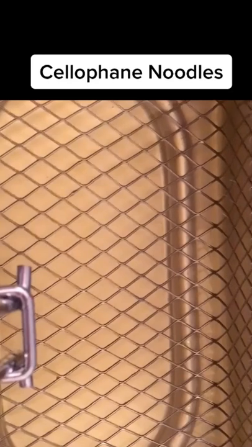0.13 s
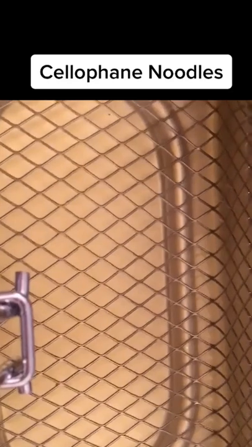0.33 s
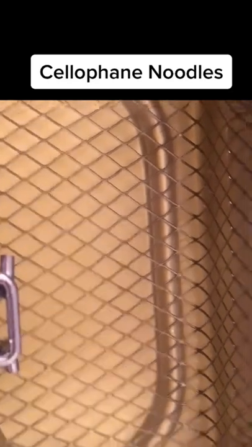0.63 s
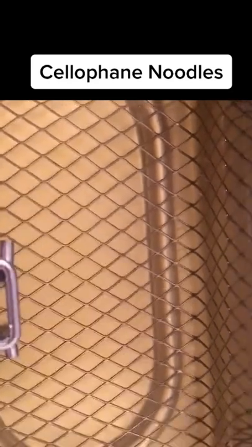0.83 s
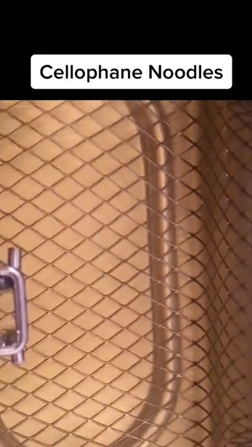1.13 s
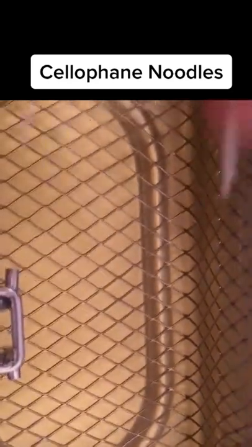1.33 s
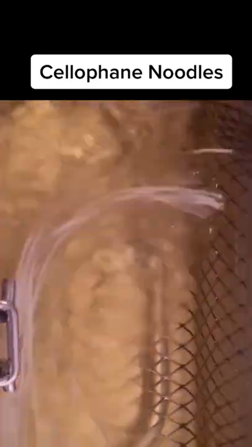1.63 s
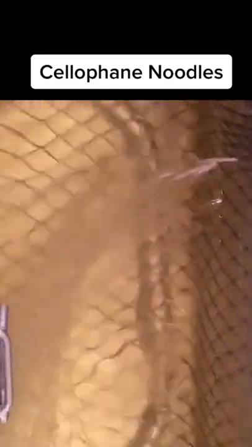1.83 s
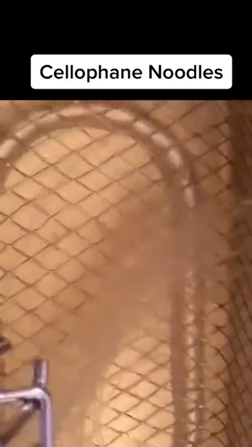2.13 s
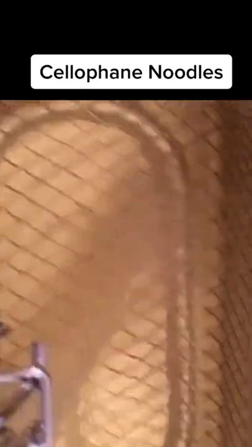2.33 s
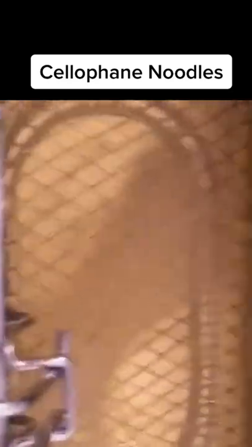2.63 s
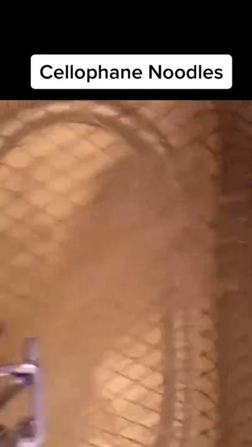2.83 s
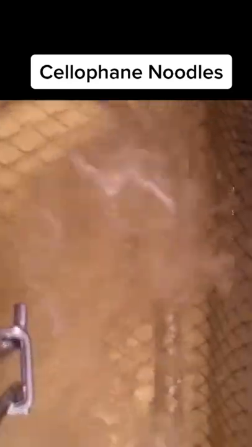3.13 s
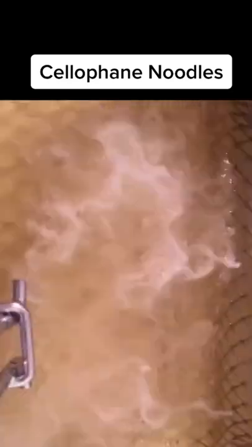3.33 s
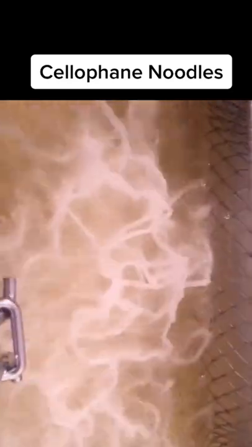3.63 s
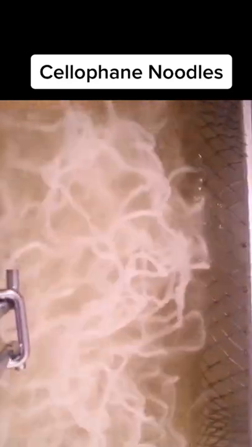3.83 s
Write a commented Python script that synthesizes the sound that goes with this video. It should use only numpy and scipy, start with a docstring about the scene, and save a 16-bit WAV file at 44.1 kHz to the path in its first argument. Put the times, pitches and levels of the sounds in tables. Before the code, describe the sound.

Deep-frying noodles heard very close in a kitchen: quiet low rumble, a faint dry rustle, a short hiss on entry, sparse high pops turning lower and denser, then loud bubbling and spitting sizzle.

```python
"""A kitchen, close above a deep fryer of hot oil, over a low rumble and fan hum: dry noodles are dropped in.
They rustle in the hand and hiss briefly at the oil: random clicks, echoed and coloured by the steel well.
Steam pops ring at the bubble's pitch, lower and lower as bubbles grow, then crowd into a boil of struck
resonators and a spitting sizzle of clicks. Puffs of steam thump on the microphone as slowing, dying sines."""
import sys
import numpy as np
from scipy import signal
from scipy.fft import rfft, irfft
from scipy.io import wavfile

SR = 44100
rng = np.random.default_rng(int(sys.argv[2]) if len(sys.argv) > 2 else 0)


def digitize_waveform(pressure):
    """Quantize a signal to 16-bit integers and store it at the path in sys.argv[1].

    Rows of a 2-D input are taken as channels; values are limited to [-1, 1].
    """
    field = np.atleast_2d(pressure).T
    bounded = np.clip(field, -1, 1)
    quanta = np.round(bounded * 32767).astype(np.int16)
    wavfile.write(sys.argv[1], SR, quanta)


N = 176400
TIME_S = np.arange(N) / SR

# Table levels are relative: each *_TRIM_DB shifts its source as a whole.

# low kitchen rumble: (frequency [Hz], gain [dB])
RUMBLE_COLOUR = [(20, -38), (35, -8), (50, -6), (66, 2.5), (85, -8), (120, -9), (165, -17), (200, -26.5),
                 (290, -20.5), (400, -32), (560, -31), (850, -38), (1300, -35.5), (2300, -43), (3000, -51),
                 (6000, -54), (15000, -59)]
# fan hum partials: (frequency [Hz], RMS level [dB])
HUM_PARTIALS = [(150, -53.5), (299, -67.5), (412, -70), (1001, -79.5)]
# dry tick: (frequency [Hz], gain [dB])
TICK_COLOUR = [(100, -12), (400, 9), (1500, 0.5), (2200, -13), (4500, 3), (8000, -12.5), (15000, -22)]
RUMBLE_DB = -45
TICK_S, TICK_DB = 0.1615, -14
START_S, FADE_IN_S = 0.057, 0.0026

# resonances of the well above the oil: (frequency [Hz], width [Hz], gain [dB])
WELL_MODES = [(600, 31, 7.5), (648, 46, 6.5), (773, 110, -1), (1243, 180, -8.5), (1410, 30, 0.5),
              (1994, 88, -0.5), (2250, 105, -3.5), (2430, 27, -6), (3766, 300, -5), (5500, 270, -2.5)]
# slow ring of the fryer: (frequency [Hz], gain [dB])
WELL_TAIL_COLOUR = [(400, -15), (600, -3.5), (720, 13), (950, 0), (1280, -5), (1450, 7.5), (1700, -15),
                    (2200, 0), (3200, -16), (8000, -25)]
ROOM_T60_S, ROOM_DB = 0.1, -17.5
WELL_TAIL_T60_S, WELL_TAIL_DB = 0.2, -13
TAIL_GAP_S = 0.008

# strands rustling: (time [s], level [dB])
RUSTLE_LEVEL = [(0.7, -85), (0.712, -75), (1.302, -59.5), (1.316, -50), (1.33, -60), (1.372, -54),
                (1.42, -64), (1.478, -57), (1.512, -53), (1.62, -69)]
# rustle: (frequency [Hz], gain [dB])
RUSTLE_COLOUR = [(400, -45), (650, -32), (1100, 0), (1400, -3), (1800, -1), (2800, -1), (4000, -4),
                 (5500, -6), (7000, -4), (15000, -11)]
# strands plunging into the oil: (time [s], level [dB])
PLUNGE_LEVEL = [(1.628, -68), (1.634, -45.5), (1.645, -37.5), (1.653, -38), (1.70, -38.5), (1.73, -52),
                (1.80, -63), (1.95, -59)]
# plunge: (frequency [Hz], gain [dB])
PLUNGE_COLOUR = [(200, -9), (600, -1), (1000, -2), (1400, 10.5), (1750, -7.5), (2300, 7), (3500, -0.5),
                 (6000, 2.5), (10000, -0.5), (15000, -2.5)]
RUSTLE_TRIM_DB = -0.5
RUSTLE_CLICKS_PER_S, PLUNGE_CLICKS_PER_S = 4600, 2500

# puffs of steam on the microphone: (time [s], level [dB], starting pitch [Hz], decay time constant [s])
PUFFS = [(3.318, -20.5, 229, 0.0032), (3.387, -21, 266, 0.003), (3.513, -17.5, 220, 0.0044),
         (3.636, -27, 198, .006), (3.700, -14.5, 243, 0.0036), (3.854, -27, 270, 0.0034),
         (3.872, -20, 246, 0.0029), (3.951, 5.5, 141, 0.0037)]
PUFF_SAG_S, PUFF_RISE_S = 0.0075, 0.00033

# bright spits of oil: (time [s], level [dB])
SPITS = [(3.1471, -10), (3.2535, -12), (3.364, -6.5), (3.465, -4.5), (3.4955, -2.5), (3.5309, -4.5),
         (3.5497, -3), (3.608, -11), (3.62, -11), (3.6326, -5.5), (3.7004, -15), (3.7144, -5), (3.8548, -4),
         (3.8714, 0.5), (3.8834, -7), (3.9499, -5)]
# snap of an oil film: (frequency [Hz], gain [dB])
SNAP_COLOUR = [(2500, -1.5), (5000, 1.5), (9500, 0.5), (10400, -4.5), (11500, -0.5), (15000, -3)]
SPIT_TRIM_DB, SPIT_SCATTER_S = -24.5, 0.0018
SNAP_LOW_CUT_HZ, SNAP_SCATTER_DB, SNAP_SCATTER_S = 3500, 10, 0.0074

# single pops: (time [s], bubble pitch [Hz], ring level [dB], well knock level [dB], snap level [dB])
POPS = [(1.8198, 10900, -37.5, -59, -63), (1.858, 9800, -33.5, -60, -65), (1.8845, 8800, -44, -66, -50),
        (1.9255, 13100, -48.0, -81, -65), (1.956, 12600, -34.0, -62, -52),
        (1.9695, 7600, -30.5, -52.5, -52), (2.0018, 5540, -23.5, -41, -31.5),
        (2.0542, 5260, -26, -38.5, -35), (2.0604, 6030, -25.0, -54, -28), (2.0817, 6600, -27, -45, -37),
        (2.1078, 3240, -28.5, -32, -34), (2.1607, 4080, -26.5, -35.5, -31.5),
        (2.191, 7140, -44, -65, -36.5), (2.2, 11000, -38, -66, -43), (2.221, 3730, -36, -32.5, -32.5),
        (2.2472, 8900, -30.5, -60, -40), (2.25, 3670, -23.5, -31, -34.5), (2.2817, 5300, -39.5, -68, -40),
        (2.337, 10100, -43.5, -74, -58), (2.356, 5200, -25.0, -38.5, -34), (2.37, 3500, -22.5, -30, -23),
        (2.4054, 5300, -28, -45, -35), (2.419, 3320, -23.5, -38, -27), (2.438, 3850, -26.5, -34, -28),
        (2.4543, 4800, -26.0, -53, -30.5), (2.464, 2760, -27.0, -32.5, -47),
        (2.5012, 4050, -29, -33.5, -31.5), (2.5274, 2900, -36.5, -43, -59.0), (2.56, 5300, -32, -40, -33),
        (2.575, 1490, -34, -30, -47.0), (2.601, 2540, -33, -57, -36.5), (2.6155, 1940, -24.5, -29.5, -61),
        (2.6294, 4000, -29.5, -45, -33), (2.643, 5500, -30, -48, -41), (2.6765, 1990, -18, -24, -25),
        (2.7701, 4050, -25, -45, -35), (2.7855, 1530, -21, -23, -46), (2.835, 1920, -24, -19.5, -33),
        (2.9292, 1350, -19.5, -37, -53), (2.953, 1930, -21.5, -29, -51), (3.0679, 1540, -17, -29.0, -51),
        (3.084, 1290, -18, -35, -52), (3.1414, 3900, -32, -45, -31), (3.25, 1900, -21.5, -30, -49),
        (3.2889, 1770, -14, -23, -33), (3.3174, 1420, -40, -21.5, -26), (3.3408, 1280, -44, -19.5, -28.5),
        (3.3872, 1410, -22, -22, -22), (3.4496, 1870, -15.5, -31, -37), (3.5104, 2300, -28, -42, -21),
        (3.5279, 1450, -32, -18, -41), (3.5468, 1320, -26, -26, -22.5), (3.5778, 1550, -20, -25, -17.5),
        (3.595, 1960, -20.5, -25, -36.0), (3.6416, 1520, -20, -17, -23), (3.686, 6700, -24, -22, -18),
        (3.693, 1450, -26.0, -40, -29), (3.7359, 2100, -17.5, -27, -33), (3.7514, 1600, -20.5, -21, -35),
        (3.811, 1240, -30, -41, -22.5), (3.8292, 2020, -29, -22.5, -18.5), (3.8511, 1170, -19, -18.5, -18),
        (3.902, 1900, -15.5, -45, -29)]
# knock in the well: (frequency [Hz], gain [dB])
KNOCK_COLOUR = [(200, -15), (480, -17), (620, -1.5), (1000, -10), (1400, 2), (2300, -0.5), (3500, -2),
                (7000, -22.5)]
POP_TRIM_DB, BURST_TRIM_DB, KNOCK_TRIM_DB, SNAP_TRIM_DB = -9.5, -13, -6.5, -7.5
POP_CYCLES = 21
BURST_WIDTH = 1.434  # band edges: pitch divided and multiplied by this
# wall reflections: level over the direct sound, time constant at mid pitch
SCATTER_DB, SCATTER_S, SCATTER_MID_HZ = 11, 0.0073, 3500
SCATTER_SLOPE = 0.26  # higher pops die sooner
SNAP_SLOPE = 0.36  # above mid pitch, a smaller bubble snaps shorter
KNOCK_SCATTER_S = 0.0087

# large bubbles: (time [s], level [dB])
LARGE_LEVEL = [(2.3, -70), (2.55, -44), (2.75, -38.5), (2.9, -30.5), (3.02, -23), (3.1, -23.5), (3.16, -22),
               (3.5, -20.5), (4.0, -21)]
# large bubbles: (frequency [Hz], gain [dB])
LARGE_COLOUR = [(100, -32), (250, 8.5), (450, -6.5), (600, -12.5), (850, 0), (1100, -3), (1500, 5),
                (4000, -21)]
# small bubbles: (time [s], level [dB])
SMALL_LEVEL = [(2.3, -78), (2.55, -40.5), (2.7, -42), (2.82, -38), (2.95, -24), (3.3, -26.5), (3.6, -20.5),
               (4.0, -22.5)]
# small bubbles: (frequency [Hz], gain [dB])
SMALL_COLOUR = [(400, -31), (900, -4), (1300, -3), (2000, 0.5), (2700, -5), (4000, -0.5), (10000, -65)]
# gurgle of like-sized bubbles leading into the boil: (time [s], level [dB])
GURGLE_LEVEL = [(2.55, -55), (2.68, -41), (2.76, -29), (2.94, -24.5), (3.08, -29), (3.25, -33), (4.0, -62)]
# gurgle: (frequency [Hz], gain [dB])
GURGLE_COLOUR = [(500, -11), (1100, -11.5), (1450, -4.5), (1800, -8), (4000, -25)]
# tiny ringing bubbles along the strands: (time [s], level [dB])
FIZZ_LEVEL = [(2.0, -57), (2.33, -58), (2.42, -46), (2.49, -47.5), (2.69, -36.5), (2.74, -39),
              (2.79, -30.5), (2.84, -28), (2.9, -37.5), (3.25, -38.5), (3.7, -28.5), (4.0, -31)]
# fizz: (frequency [Hz], gain [dB])
FIZZ_COLOUR = [(1500, -7), (3000, 2.5), (4000, -1.5), (5400, 4), (7000, -2.5), (9500, 2), (10400, -11),
               (12000, -10), (15000, -6)]
# sizzle: (time [s], level [dB])
SIZZLE_LEVEL = [(1.75, -90), (2.0, -56), (2.32, -60), (2.42, -53), (2.72, -46), (2.84, -40), (3.2, -39),
                (3.42, -31.5), (3.62, -31), (3.71, -18), (3.78, -23.5), (3.87, -26), (4.0, -22.5)]
# sizzle: (frequency [Hz], gain [dB])
SIZZLE_COLOUR = [(300, -14.5), (1200, 6.5), (2800, 2.5), (4000, 2), (5500, 0), (7500, 1), (9500, 2.5),
                 (10300, -1.5), (12000, 1), (15500, -12.5)]
LARGE_TRIM_DB, SMALL_TRIM_DB, FIZZ_TRIM_DB = -1, -1, -0.5
LARGE_PER_S, SMALL_PER_S, GURGLE_PER_S, FIZZ_PER_S = 500, 380, 160, 600
SIZZLE_CLICKS_PER_S = 1100
BUBBLE_CYCLES = 9.1

LOW_CUT_HZ, HIGH_CUT_HZ, SOFT_PEAK = 44, 15250, 1.3


def from_db(db):
    """Decibels to amplitude gain."""
    return 10 ** (np.asarray(db) / 20)


def rms_one(x):
    """Scale to unit RMS."""
    return x / np.sqrt(np.mean(x ** 2) + 1e-20)


def level(rows):
    """Gain along a level curve, -120 dB before its first point."""
    s, db = np.transpose(rows)
    return from_db(np.interp(TIME_S, s, db, left=-120))


def add(out, s, sound):
    """Mix a sound in at a time."""
    start = int(s * SR)
    out[start:start + len(sound)] += sound[:max(N - start, 0)]


def colour(x, points):
    """Minimum-phase filter through (Hz, dB) points, by folding the cepstrum."""
    hz, db = np.transpose(points)
    size = 8192
    grid_hz = np.maximum(np.fft.rfftfreq(size, 1 / SR), 1)
    gain = from_db(np.interp(np.log(grid_hz), np.log(hz), db))
    cepstrum = irfft(np.log(gain))
    cepstrum[1:size // 2] *= 2
    cepstrum[size // 2 + 1:] = 0
    impulse = irfft(np.exp(rfft(cepstrum)))
    return signal.fftconvolve(x, impulse)[:len(x)]


def high_pass(x, order, hz):
    """Butterworth low cut."""
    return signal.sosfilt(signal.butter(order, hz, "high", fs=SR, output="sos"), x)


def ring(x, hz, cycles):
    """A bubble as a two-pole resonator: a click rings it, dying by 60 dB in so many cycles."""
    r = np.exp(-np.log(1000) * hz / (cycles * SR))
    w = 2 * np.pi * hz / SR
    return signal.lfilter([.5, 0, -.5], [1, -2 * r * np.cos(w), r * r], x + 1e-18)


def scatter(reflected_db, decay_s):
    """A click and its fast-dying reflections from one spot in the well; unit energy."""
    t = TIME_S[:SR // 20]
    echoes = rng.standard_normal(len(t)) * np.exp(-t / decay_s)
    path = echoes * from_db(reflected_db) / np.linalg.norm(echoes)
    path[0] += 1
    return path / np.linalg.norm(path)


def well(x):
    """The air in the steel well: parallel resonances added to the direct sound."""
    out = x.copy()
    for hz, width_hz, db in WELL_MODES:
        r = np.exp(-np.pi * width_hz / SR)
        zeros = np.array([1, 0, -1]) * (1 - r * r) / 2
        poles = [1, -2 * r * np.cos(2 * np.pi * hz / SR), r * r]
        out += from_db(db) * signal.lfilter(zeros, poles, x)
    return out


def clicks(per_s, spread_db):
    """Random clicks of either sign, many small and a few large."""
    sizes = from_db(spread_db * np.minimum(rng.exponential(1, N), 4))
    hits = rng.random(N) < per_s / SR
    return hits * sizes * rng.choice([-1, 1], N)


def crackle(per_s, spread_db, points, reflected_db, count=8):
    """Clicks reflected from several spots in the well; unit RMS."""
    out = np.zeros(N)
    for _ in range(count):
        hits = clicks(per_s / count, spread_db)
        path = scatter(reflected_db, SNAP_SCATTER_S)
        out += signal.oaconvolve(hits, path)[:N]
    return rms_one(colour(well(out), points))


def bubbles(per_s, low_hz, high_hz, spread_db, points, count=14):
    """A crowd of ringing bubbles over a range of sizes; unit RMS."""
    out = np.zeros(N)
    for hz in np.geomspace(low_hz, high_hz, count):
        hits = clicks(per_s / count, spread_db)
        bubble = ring(scatter(reflected_db=-0.5, decay_s=0.0044), hz, BUBBLE_CYCLES)
        out += signal.oaconvolve(hits, bubble)[:N]
    return rms_one(colour(well(out), points))


def rumble():
    """Steady kitchen rumble: coloured noise."""
    return from_db(RUMBLE_DB) * rms_one(colour(rng.standard_normal(N), RUMBLE_COLOUR))


def fan_hum():
    """Steady sines at random phases."""
    out = np.zeros(N)
    for hz, db in HUM_PARTIALS:
        out += from_db(db) * np.sqrt(2) * np.sin(2 * np.pi * (hz * TIME_S + rng.random()))
    return out


def tick():
    """One dry tick: a coloured unit impulse."""
    out = np.zeros(N)
    impulse = 1.0 * (TIME_S[:SR // 20] == 0)
    add(out, TICK_S, from_db(TICK_DB) * colour(impulse, TICK_COLOUR))
    return out


def background():
    """Rumble, hum and tick, faded in from silence."""
    fade = np.clip((TIME_S - START_S) / FADE_IN_S, 0, 1)
    return (rumble() + fan_hum() + tick()) * fade


def tail(t60_s):
    """A diffuse noise decay after a gap; unit energy."""
    t = TIME_S[:SR // 2]
    echoes = rng.standard_normal(len(t)) * np.exp(-np.log(1000) * t / t60_s) * (t > TAIL_GAP_S)
    return echoes / np.linalg.norm(echoes)


def kitchen(x):
    """A short tail from hard walls and the slower ring of the fryer."""
    room = from_db(ROOM_DB) * tail(ROOM_T60_S)
    fryer = from_db(WELL_TAIL_DB) * colour(tail(WELL_TAIL_T60_S), WELL_TAIL_COLOUR)
    return x + signal.fftconvolve(x, room + fryer)[:N]


def rustle():
    """Dry strands rub: dense, strongly reflected clicks."""
    sound = crackle(RUSTLE_CLICKS_PER_S, 6.0, RUSTLE_COLOUR, reflected_db=11)
    return level(RUSTLE_LEVEL) * from_db(RUSTLE_TRIM_DB) * sound


def plunge():
    """Strands hiss as they meet the oil: dense clicks in a short swell."""
    return level(PLUNGE_LEVEL) * crackle(PLUNGE_CLICKS_PER_S, 5.3, PLUNGE_COLOUR, reflected_db=6)


def puffs():
    """Steam on the microphone: short pressure swings that slow as they die."""
    out, t = np.zeros(N), TIME_S[:SR // 10]
    for s, db, hz, decay_s in PUFFS:
        turns = hz * PUFF_SAG_S * np.log1p(t / PUFF_SAG_S)
        envelope = (1 - np.exp(-t / PUFF_RISE_S)) * np.exp(-t / decay_s)
        add(out, s, from_db(db) * np.sin(2 * np.pi * turns) * envelope)
    return out


def snap(decay_s):
    """The bright crack of an oil film breaking: a high-passed, reflected click."""
    crack = high_pass(scatter(SNAP_SCATTER_DB, decay_s), 1, SNAP_LOW_CUT_HZ)
    return colour(crack, SNAP_COLOUR)


def spits():
    """Droplets burst at the surface with a short snap."""
    out = np.zeros(N)
    for s, db in SPITS:
        add(out, s, from_db(db + SPIT_TRIM_DB) * rms_one(snap(SPIT_SCATTER_S)))
    return out


def pops():
    """Each pop is a snap, a rough burst that rings at the bubble's pitch, and a knock in the well."""
    out = np.zeros(N)
    for s, hz, ring_db, knock_db, snap_db in POPS:
        path = scatter(SCATTER_DB, SCATTER_S * (SCATTER_MID_HZ / hz) ** SCATTER_SLOPE)
        edges_hz = [hz / BURST_WIDTH, hz * BURST_WIDTH]
        band = signal.butter(2, edges_hz, "band", fs=SR, output="sos")
        burst = well(signal.sosfilt(band, path))
        knock = colour(well(scatter(SCATTER_DB, KNOCK_SCATTER_S)), KNOCK_COLOUR)
        snap_s = SNAP_SCATTER_S * min(SCATTER_MID_HZ / hz, 1) ** SNAP_SLOPE
        add(out, s, from_db(ring_db + POP_TRIM_DB) * rms_one(ring(burst, hz, POP_CYCLES)))
        add(out, s, from_db(ring_db + BURST_TRIM_DB) * rms_one(burst))
        add(out, s, from_db(knock_db + KNOCK_TRIM_DB) * rms_one(knock))
        add(out, s, from_db(snap_db + SNAP_TRIM_DB) * rms_one(snap(snap_s)))
    return out


def boil():
    """Large and small bubbles churn with a gurgle, under a fizz of tiny ones."""
    large = bubbles(LARGE_PER_S, 560, 1100, 2.6, LARGE_COLOUR, count=10)
    small = bubbles(SMALL_PER_S, 1160, 2930, 3.63, SMALL_COLOUR, count=10)
    gurgle = bubbles(GURGLE_PER_S, 1320, 1700, 3.1, GURGLE_COLOUR, count=4)
    fizz = bubbles(FIZZ_PER_S, 2800, 12800, 3.86, FIZZ_COLOUR)
    out = level(LARGE_LEVEL) * from_db(LARGE_TRIM_DB) * large
    out += level(SMALL_LEVEL) * from_db(SMALL_TRIM_DB) * small
    out += level(GURGLE_LEVEL) * gurgle
    out += level(FIZZ_LEVEL) * from_db(FIZZ_TRIM_DB) * fizz
    return out


def sizzle():
    """Spitting oil: random clicks in the well."""
    return level(SIZZLE_LEVEL) * crackle(SIZZLE_CLICKS_PER_S, 4.2, SIZZLE_COLOUR, reflected_db=-3)


def scene():
    """The fryer in its kitchen, one channel; puffs and background get no tail."""
    fryer = rustle() + plunge() + pops() + spits() + boil() + sizzle()
    return (kitchen(fryer) + puffs() + background())[None]


def record(dry):
    """The deepest bass is lost, peaks are rounded and the top is cut."""
    thinned = high_pass(dry, 2, LOW_CUT_HZ)
    rounded = SOFT_PEAK * np.tanh(thinned / SOFT_PEAK)
    return signal.sosfilt(signal.ellip(10, .1, 80, HIGH_CUT_HZ, fs=SR, output="sos"), rounded)


dry = scene()
out = record(dry)
digitize_waveform(out)
```